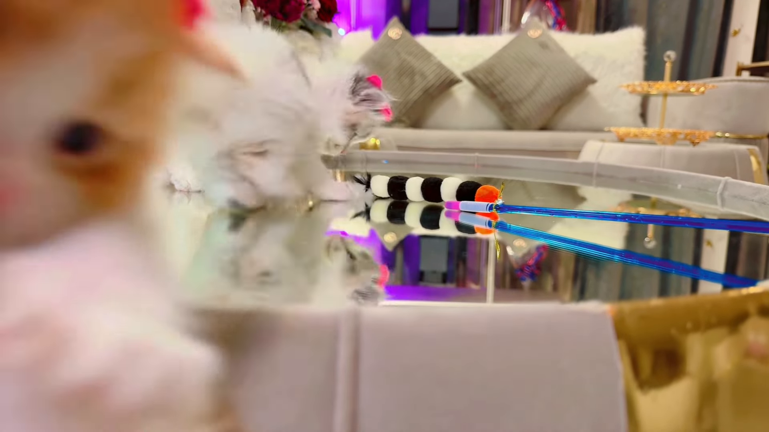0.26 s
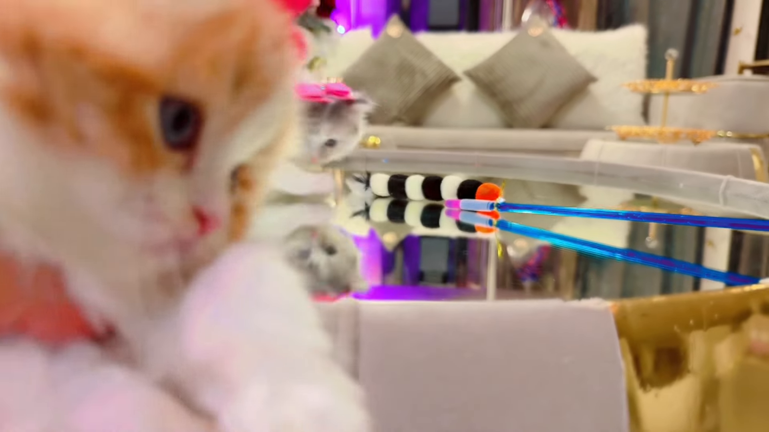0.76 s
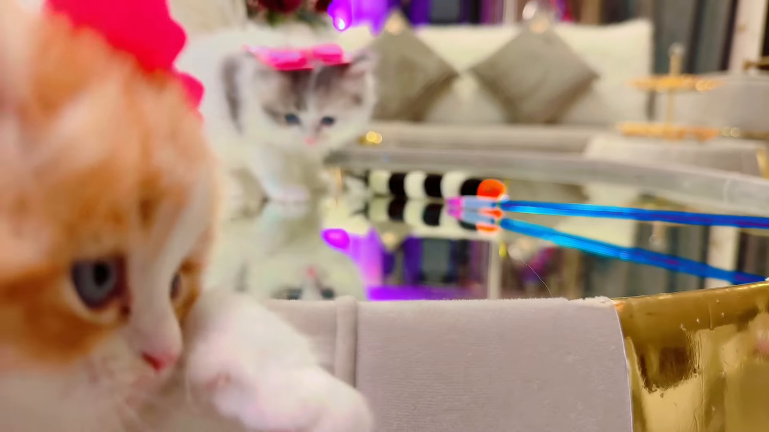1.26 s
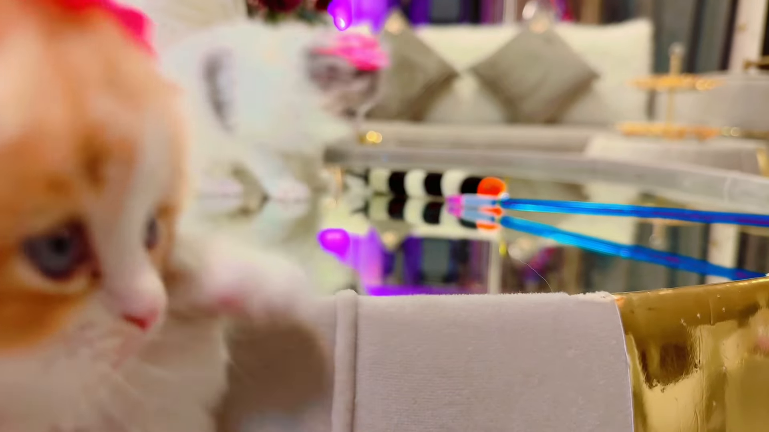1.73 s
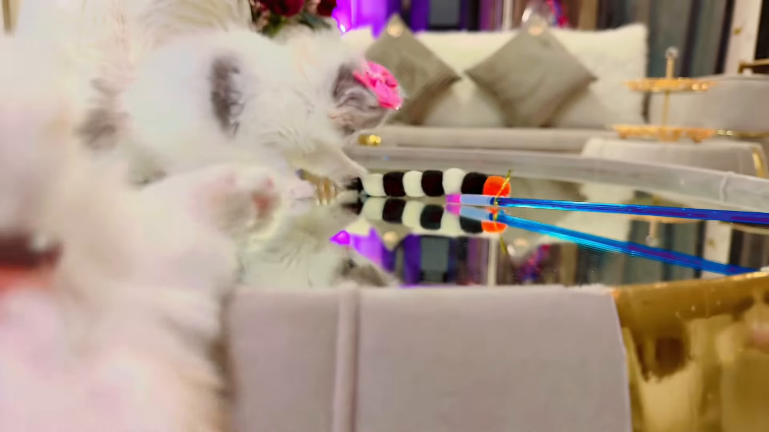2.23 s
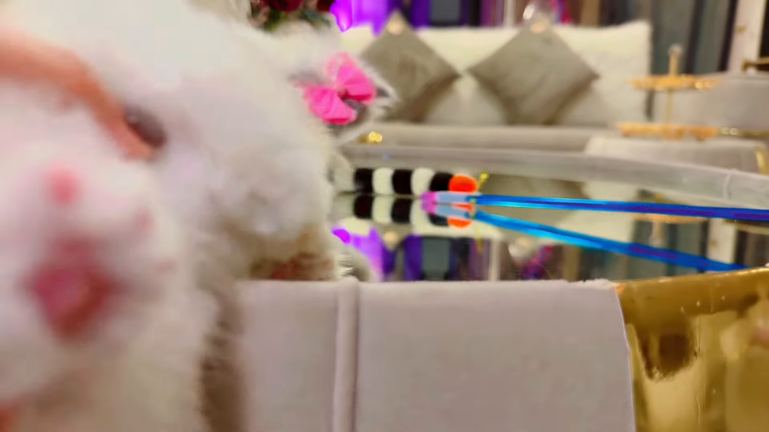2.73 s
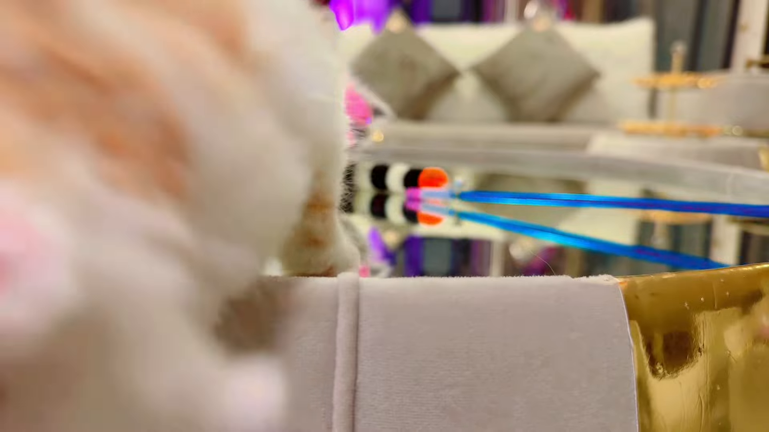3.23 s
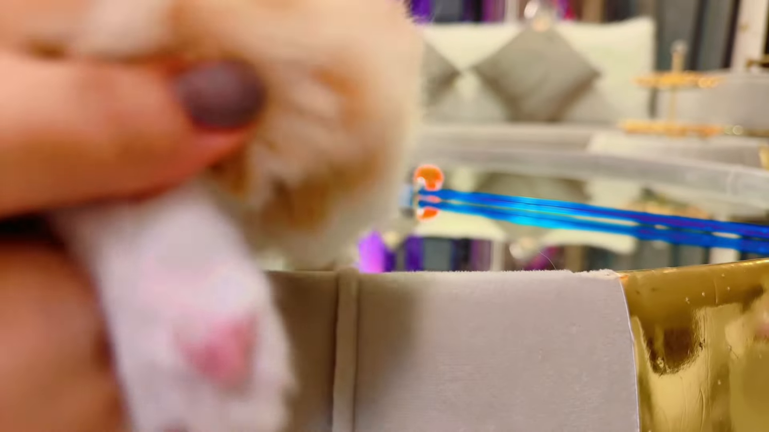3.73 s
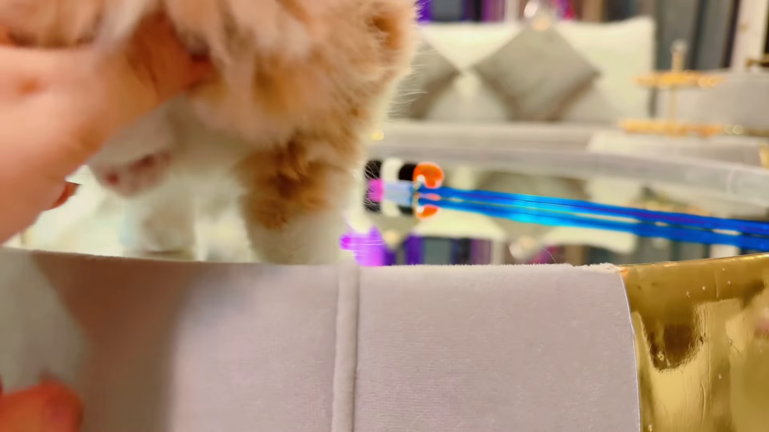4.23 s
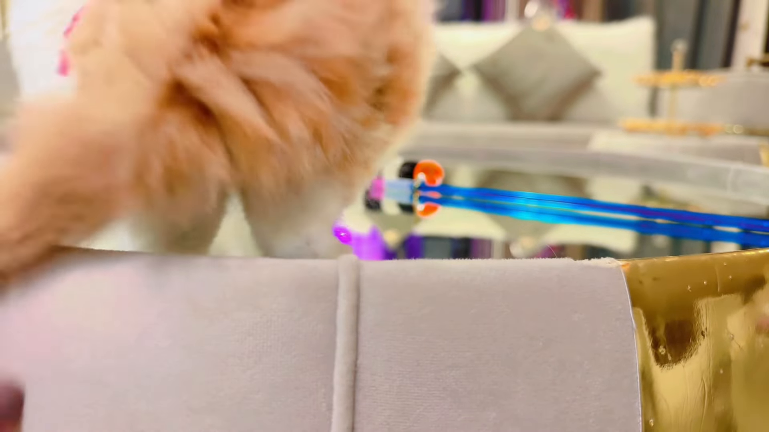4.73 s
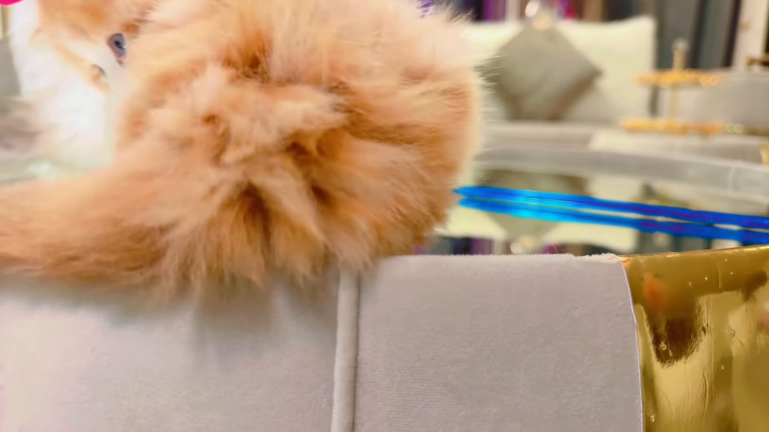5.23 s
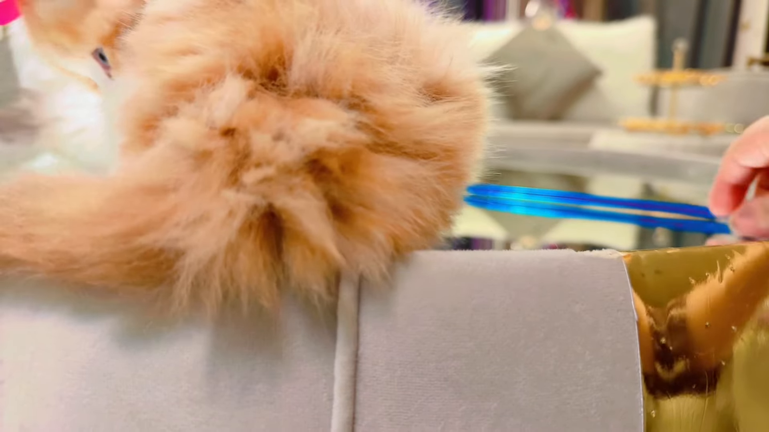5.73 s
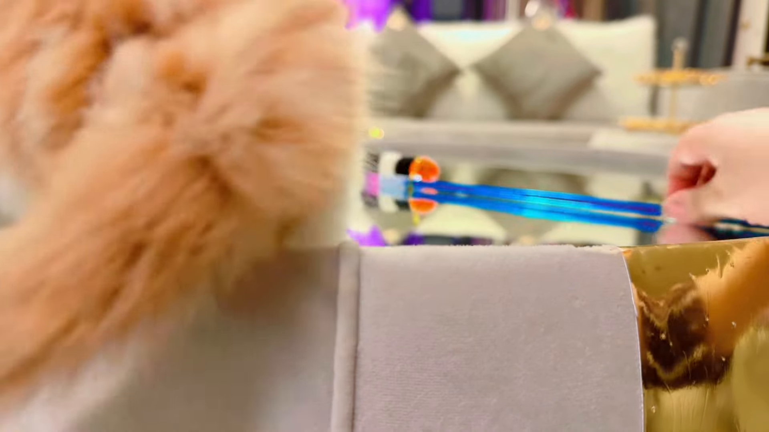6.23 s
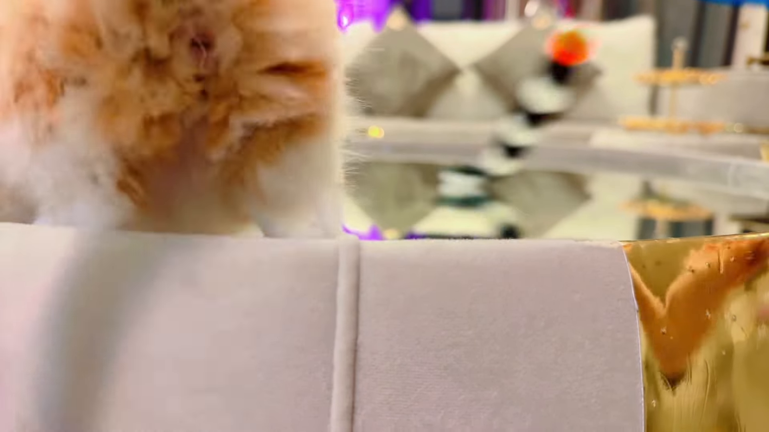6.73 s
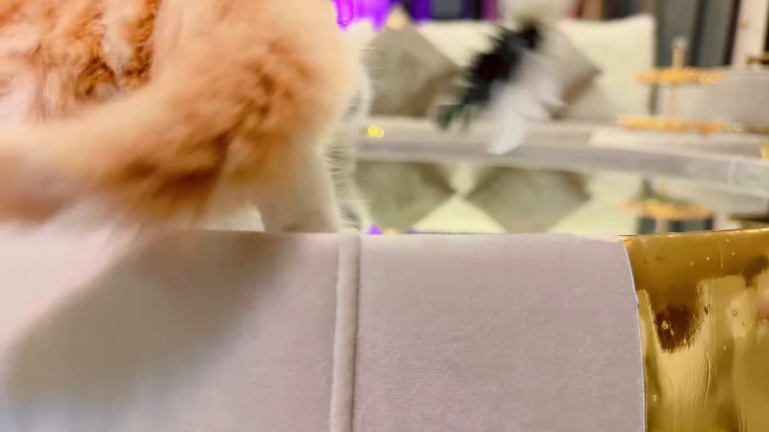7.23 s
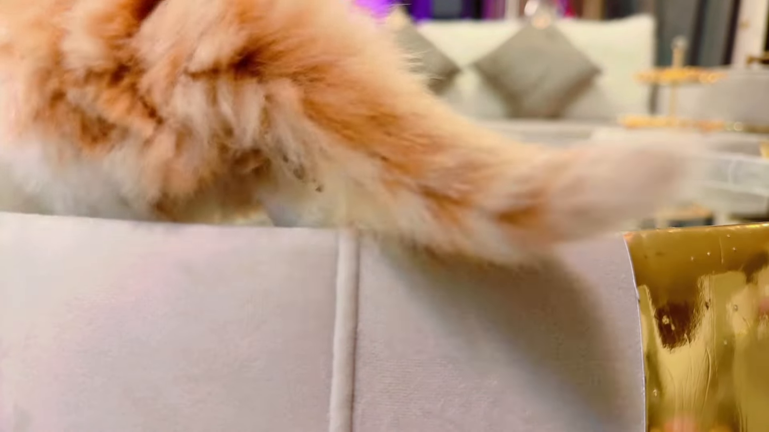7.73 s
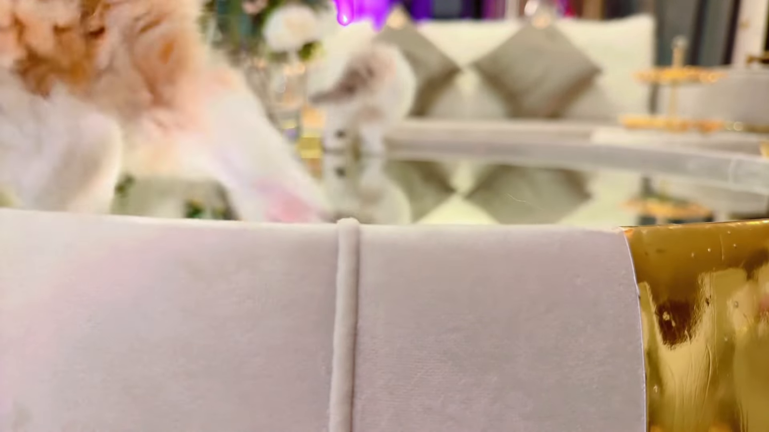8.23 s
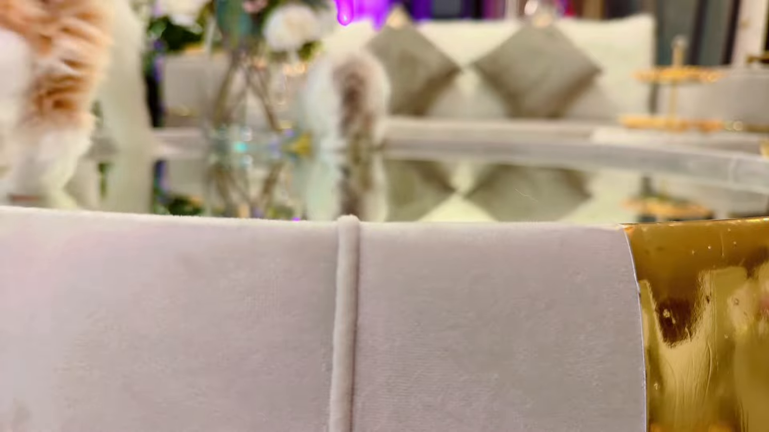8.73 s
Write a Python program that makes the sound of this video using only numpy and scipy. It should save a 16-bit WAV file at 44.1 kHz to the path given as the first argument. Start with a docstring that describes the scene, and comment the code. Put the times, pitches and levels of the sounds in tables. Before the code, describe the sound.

A furnished living room, heard close by a phone, with steady wavering low hum around 100 Hz and faint hiss. From 0 to 0.8 s, soft dull paw bumps; a barely audible very high squeak at the start and occasional tiny high ticks. At 2.0 s a tiny pellet bell and light knock, then faint fur scuffs and another touch at 2.7 s. Around 3.1-3.4 s the bell rattles and a hard, loud knock tumbles on glass with metal chinks. From 4.1 to 4.8 s, scuffs, light taps and bright chinks, strongest at 4.6 s. A soft bump at 5.6 s. At 6.1 s the bell strikes sharply, with a crisp tick at 6.3 s, then shakes in irregular dry high rattles, densest from 7.6 to 8.3 s. From 8.35 s to the end near 9 s, claws pluck fabric in dry, crackling snaps over a grainy drag, thinning out but continuing.

```python
"""Living room with a low hum: kittens romp on a glass table with an upholstered rim, close to a phone.
A wand toy's tiny pellet bell (noise-buzzed impulses through a shell resonance) is batted, lifted and shaken.
Hard bits knock on the glass and metal trinkets chink (decaying modes plus noise); paws thud and scuff
(filtered noise); a thin squeak (gliding sine) and high ticks (resonant noise) pass by.
At the end claws pluck the fabric (coloured clicks over grainy noise)."""
import sys
import numpy as np
from scipy import signal
from scipy.fft import rfft, irfft, next_fast_len
from scipy.io import wavfile
from scipy.ndimage import uniform_filter1d

SR = 44100
rng = np.random.default_rng(int(sys.argv[2]) if len(sys.argv) > 2 else 0)


def transcribe(signal):
    """Save signal, clipped to [-1, 1], as a 16-bit WAV file at the path in sys.argv[1]."""
    frames = np.atleast_2d(signal).T
    limited = np.clip(frames, -1, 1)
    pcm = np.round(limited * 32767).astype(np.int16)
    wavfile.write(sys.argv[1], SR, pcm)


N = 395136
T = np.arange(N) / SR
RING_T = T[:SR // 3]

# Jolts throw the pellet at its shell, then it rattles (10 ms at least):
# start_s, strike_peak_db (before trim), rattle_db, rattle_s
JOLTS = [(1.9897, -24.5, -54, 0.06), (1.995, -30, -54, .01), (2.617, -52, -70, .01),
         (2.702, -29, -58, 0.11), (2.874, -53, -62, 0.013), (3.047, -63, -59, 0.14),
         (3.115, -24, -44, 0.01), (3.1225, -24.5, -46, 0.018), (3.1487, -35, -56, .01),
         (3.157, -30, -52, 0.04), (3.316, -23, -39, .02), (3.368, -25, -41, 0.033),
         (3.4148, -30.5, -56, 0.043), (3.545, -51, -65, .01), (5.578, -44, -61, 0.032),
         (6.0776, -16.5, -43, 0.014), (6.092, -25, -49.5, 0.07), (6.2298, -20.5, -49, 0.052),
         (6.431, -42, -58, 0.045), (6.6588, -23, -46, 0.02), (6.708, -37, -56, .01),
         (6.7451, -37, -52, 0.024), (6.7726, -37, -49, .018), (6.828, -37, -46, 0.025),
         (6.8514, -25, -50, .012), (6.906, -28, -44.5, 0.027), (6.942, -27, -50, 0.029),
         (6.9855, -30, -56, 0.017), (7.224, -33, -55, 0.02), (7.2706, -35, -61, 0.012),
         (7.309, -31, -49, 0.01), (7.317, -32, -46, 0.011), (7.3212, -31, -47, 0.014),
         (7.422, -37, -56, 0.013), (7.4783, -29, -50, .01), (7.483, -27.5, -49, .01),
         (7.493, -30, -46, 0.023), (7.523, -39, -48.5, 0.033), (7.577, -35, -60, .01),
         (7.585, -25, -37, 0.013), (7.591, -21, -33, 0.016), (7.6035, -22, -42, 0.013),
         (7.6177, -23, -50, .01), (7.6315, -23, -39, 0.011), (7.6396, -26, -34, 0.0084),
         (7.651, -23, -47, 0.029), (7.698, -30, -43, 0.018), (7.749, -38, -47, 0.026),
         (7.779, -27, -53, 0.033), (7.9166, -27.5, -52, 0.039), (8.056, -28, -46, 0.01),
         (8.065, -24.5, -52, 0.017), (8.1065, -16.5, -31, 0.01), (8.1168, -23, -43, 0.016),
         (8.134, -30, -48, 0.044), (8.1782, -19.5, -38, 0.016), (8.211, -23, -48, 0.01),
         (8.225, -25, -45, 0.01), (8.2333, -31, -44, .01), (8.2379, -31, -46, 0.026),
         (8.292, -31, -54, .01), (8.333, -26.5, -45, 0.013)]
# Pellet rolling while the wand is carried: time_s, level_db (before trim)
ROLLING = [(6.1, -72), (6.17, -68), (6.27, -61.5), (6.62, -59.5), (6.82, -53), (7.01, -83), (7.24, -63.5),
           (7.46, -68), (7.62, -53), (7.73, -75), (7.88, -50.5), (8.04, -62), (8.15, -49), (8.26, -49),
           (8.32, -64), (8.4, -61)]
# Shell swings free of the fur and rings until touched: start_s, peak_db (before trim), t60_s
FREE_RINGS = [(6.08, -26.5, 0.054), (6.604, -35, 0.079), (6.651, -30, 0.045), (6.765, -43, .08),
              (6.92, -42, 0.073), (7.299, -39, .06), (7.4224, -48, 0.06), (7.6176, -32, 0.081),
              (8.21, -39, 0.22)]


def bell(strike_trim_db=3, settle_db=5, roll_trim_db=-2, ring_trim_db=-2.5, graze_db=-21, graze_s=0.0025):
    """A pellet strikes a tiny shell that fur mostly damps; it rattles after each jolt and rolls on between."""
    carried_s, carried_db = np.transpose(ROLLING)
    roll_gain = np.interp(T, carried_s, undb(carried_db + roll_trim_db), left=0, right=0)
    out = rolling(rate_hz=110, spread_db=11.5) * roll_gain
    rattle = rolling(rate_hz=380, spread_db=13.5)
    for start_s, strike_db, rattle_db, rattle_s in JOLTS:
        # the pellet grazes the shell just before it hits
        add(out, start_s - graze_s, undb(strike_db + graze_db) * tink())
        add(out, start_s, undb(strike_db + strike_trim_db) * tink())
        run = rattle[(T >= start_s) & (T < start_s + max(rattle_s, .01))]
        settle = undb(np.linspace(0, -settle_db, len(run))) * signal.windows.tukey(len(run), .1)
        add(out, start_s, level(run * settle, rattle_db))
    for start_s, peak_db, t60_s in FREE_RINGS:
        add(out, start_s, undb(peak_db + ring_trim_db) * shell_tone(t60_s))
    return out


def rolling(rate_hz, spread_db, spots=8):
    """The pellet lands at random, with uneven force, on different spots of the shell."""
    force = undb(spread_db * rng.uniform(-1, 1, N))
    hits = (rng.random(N) < rate_hz / SR) * force
    spot = rng.integers(0, spots, N)
    return level(sum(signal.oaconvolve(hits * (spot == k), tink())[:N] for k in range(spots)), 0)


# Broad resonance of the damped shell: pitch_hz (before detune), gain_db (before peak scaling)
SHELL_COLOUR = [(1000, -65.5), (5000, -43.5), (6000, -36), (6550, -32.5), (7100, -39), (8000, -33),
                (9000, -19.5), (9600, -6.5), (9900, 2.5), (10400, -7), (11000, -16), (12000, -26.5),
                (13000, -26), (16000, -33)]
# Shell ring after each touch: pitch_hz (before detune), level_db, t60_s
SHELL_MODES = [(6600, -41.5, 0.037), (9630, -26, .032), (10600, -31, .035), (11120, -30, 0.078)]


def tink(detune=0.0071, buzz_db=-27, buzz_t60_s=0.011, size=4096):
    """One pellet touch: a randomly detuned damped click, a brief buzz and a faint ring of the shell."""
    push = undb(buzz_db) * burst(buzz_t60_s)[:size]
    push[0] += 1
    shift = 1 + detune * rng.standard_normal()
    damped = peak(colour(push, [(hz * shift, db) for hz, db in SHELL_COLOUR]), 0)
    return damped + ring(SHELL_MODES, scatter_db=0.0, detune=0.0019)[:size]


def shell_tone(t60_s, pitch_hz=11190):
    """The shell's one clear tone, dying away."""
    return fade(t60_s) * np.sin(2 * np.pi * pitch_hz * RING_T)


# Hard knocks on the glass, a tumble after 3.3 s: start_s, peak_db (before trim),
# thump_peak_db (before trim), piece_hz, piece_re_peak_db, crack_upper_edge_hz
KNOCKS = [(1.9884, -34.5, -53, 3460, -17, 12000), (1.997, -39.5, -57, 4000, -14, 12000),
          (2.112, -51, -51, 7300, -6, 9000), (2.6995, -39, -53, 3210, -13, 9000),
          (2.707, -41.5, -58, 3800, -15, 9000), (3.3147, -13.5, -38, 3090, -13, 13000),
          (3.324, -35, -43, 1770, -4, 12000), (3.335, -31.5, -36.5, 5160, 0, 12000),
          (3.345, -41, -43, 3725, -8, 12000), (3.3714, -20.5, -35, 3240, -22, 14000),
          (3.38, -35, -38, 936, -6.5, 14000), (3.387, -34.5, -33.5, 8500, -2, 14000),
          (3.414, -41, -37, 1020, -1, 14000), (3.438, -38, -35.5, 3400, -4, 12000),
          (4.116, -47, -62, 4300, -16, 9000), (4.179, -48, -62, 3860, -19, 7000),
          (4.469, -44.5, -66, 2860, -5, 8000), (4.499, -42, -67, 2840, -8, 7000),
          (4.577, -49, -66, 2800, -8, 9000), (5.577, -44.5, -43, 2170, 1.5, 3500),
          (6.077, -31.5, -52, 1720, -13, 9000), (6.08, -40.5, -57, 2880, 0, 9000),
          (6.1797, -33, -40, 3270, -11, 5540), (6.229, -41.5, -58, 2620, -7.5, 8000),
          (7.961, -48.5, -66, 3780, -3, 9000), (8.107, -48, -70, 2230, -8, 6000)]
# Modes of the table and the toy on it: pitch_hz (before detune), level_db (relative), t60_s
TABLE_MODES = [(581, -12, .16), (720, -10, .07), (930, -7, .08), (1093, -4, .1), (1380, -9, .06),
               (1740, -4.5, .06), (1809, -3, .09), (3020, -7, .05), (3321, -9, .16), (3690, -10, .13),
               (4381, -11, .15), (4853, -10, .14), (5170, -7, .2), (5522, -5, .18), (5943, -9, .18),
               (6234, -9, .06), (6961, -12, .16), (7471, -9, .18), (7931, -9, .16), (8376, -12, .18)]


def knocks(knock_trim_db=1, modes_db=-5, stir=0.24, hard_knock_db=-11, click_db=-1, click_t60_s=0.0079,
           crack_t60_s=0.032, clatter_db=-18, clatter_t60_s=0.23, body_db=-1, body_hz=3600, body_q=1.8,
           piece_t60_s=0.032, thump_trim_db=-2):
    """A contact clicks and cracks, struck piece and table ring, loose things clatter, the frame thumps."""
    out = np.zeros(N)
    for start_s, peak_db, thump_db, piece_hz, piece_db, edge_hz in KNOCKS:
        # light touches barely stir the heavy glass
        stirred_db = modes_db + stir * (peak_db - hard_knock_db)
        modes = peak(ring(TABLE_MODES, scatter_db=2.0, detune=0.0006), stirred_db)
        click = undb(click_db) * burst(click_t60_s)
        clatter = undb(clatter_db) * burst(clatter_t60_s)
        crack = band(click + burst(crack_t60_s) + clatter, 470, edge_hz)
        crack = peak(crack + undb(body_db) * resonate(crack, body_hz, body_q), 0)
        piece = undb(peak_db + piece_db) * fade(piece_t60_s) * np.sin(2 * np.pi * piece_hz * RING_T)
        thump = peak(band(burst(0.1), 104, 490), thump_db + thump_trim_db)
        add(out, start_s, peak(modes + crack, peak_db + knock_trim_db) + piece + thump)
    return out


# Thread snaps: start_s, peak_db (before trim), tilt_db_per_octave
SNAPS = [(8.333, -45, -2), (8.3385, -41, -2), (8.344, -41, -8), (8.3548, -24, 0.5), (8.3565, -22, -1),
         (8.3639, -16, 0.5), (8.388, -32, -2), (8.391, -25, 2), (8.4064, -14.5, 1.5), (8.416, -25, 0),
         (8.4203, -25.5, -1), (8.4306, -28, 0.5), (8.472, -32, -1), (8.4832, -19, 1.5), (8.4852, -19.5, 4),
         (8.4962, -30, -1.5), (8.539, -35, -2), (8.5536, -27, 0.5), (8.5685, -19.5, -2), (8.5698, -24, -2),
         (8.5812, -32, 2), (8.592, -23, 3), (8.6017, -31, -4), (8.617, -19.5, 1.5), (8.63, -33, 1),
         (8.638, -28, -0.5), (8.6454, -31.5, -2.5), (8.701, -37, -3), (8.7201, -34.5, -3.5),
         (8.739, -37, -2.5), (8.7665, -34, -2.5), (8.7849, -24.5, -1.5), (8.7934, -26, 0),
         (8.8018, -27, -1), (8.807, -28, 0), (8.8235, -22.5, 7), (8.8332, -25.5, -1.5), (8.8452, -28.5, 0)]
# Claw dragging through the pile: pitch_hz, gain_db (before level scaling)
FIBRE_COLOUR = [(300, -1.5), (900, 1.5), (1800, 2.5), (3000, -2.5), (7000, -9), (16000, -18)]


def claws(snap_trim_db=2.0, slip_db=-11, slip_s=0.00076, drag_db=-39.5, drag_s=0.021, grain_db=6):
    """A claw drags through fine fibres, slips a little, then taut threads let go one by one with dry snaps."""
    out, pull = np.zeros(N), np.zeros(N)
    for start_s, peak_db, tilt in SNAPS:
        add(out, start_s - slip_s, undb(peak_db + slip_db) * snap(tilt))
        add(out, start_s, undb(peak_db + snap_trim_db) * snap(tilt))
        near = np.abs(T - start_s) < .1
        pull[near] += undb(peak_db) * np.exp(-np.abs(T[near] - start_s) / drag_s)
    fibres = rng.standard_normal(N) * undb(grain_db * walk(500))
    return out + pull * level(colour(fibres, FIBRE_COLOUR), drag_db)


# Snapping thread: pitch_hz (before detune), gain_db (before tilt and scatter)
SNAP_COLOUR = [(300, -16), (800, -6), (1250, 2), (1900, 9.5), (2500, 3), (3100, -1.5), (3600, 2),
               (4300, -0.5), (6200, 0.5), (7200, 4.5), (7700, -2.5), (9000, 0), (10700, 5.5), (12500, -4.5),
               (13800, 3), (16000, -2.5)]


def snap(tilt, fray_db=-10, fray_t60_s=0.0052, detune=0.054, scatter_db=3.0):
    """One thread lets go: a sharp click and a trace of fraying, with random pitch and colour."""
    push = undb(fray_db) * burst(fray_t60_s)[:1024]
    push[0] += 1
    shift = np.exp(detune * rng.standard_normal())
    scatter = scatter_db * rng.standard_normal(len(SNAP_COLOUR))
    points = [(hz * shift, db + tilt * np.log2(hz) + extra)
              for (hz, db), extra in zip(SNAP_COLOUR, scatter)]
    return peak(colour(push, points), 0)


# Metal trinket jangles: start_s, peak_db (before trim), t60_s, jangle_s
CHINKS = [(3.079, -35.5, 0.031, 0), (3.223, -25.5, 0.012, 0), (3.314, -23.5, 0.09, 0.025),
          (3.375, -33, .08, 0), (3.392, -31, 0.073, .015), (3.593, -40.5, 0.052, 0),
          (4.139, -28.5, 0.058, 0.051), (4.357, -44, 0.046, 0), (4.378, -38, 0.1, 0.017),
          (4.491, -39, .037, 0), (4.586, -25, 0.13, 0), (4.603, -21, 0.14, 0), (4.746, -36.5, 0.061, 0.03),
          (4.83, -37.5, 0.039, 0.02), (5.577, -47, .03, 0), (7.256, -44, 0.042, 0.047)]
# Trinket modes: pitch_hz (before detune), level_db (relative)
TRINKET_MODES = [(6150, -5), (6260, -10), (7100, -12), (8100, -16), (8750, -10), (8880, -11), (9700, -4),
                 (10300, 4), (10480, -3), (10950, -2), (11400, -4), (11850, -8), (12600, -2), (12850, -5),
                 (13400, -5), (14050, -3), (14600, -7), (15400, -2), (15580, -2)]


def chinks(chink_trim_db=1, scrape_db=-2, grain_db=5, gap_s=0.021, fall_db=5):
    """Small metal pieces jangle with a bright ring and a grainy scrape."""
    out = np.zeros(N)
    for start_s, first_db, t60_s, jangle_s in CHINKS:
        modes = [(hz, db, t60_s) for hz, db in TRINKET_MODES]
        for contact_s, peak_db in flurry(start_s, first_db, jangle_s, gap_s, fall_db):
            metal = peak(ring(modes, scatter_db=5.0, detune=0.006), 0)
            steps = np.repeat(rng.standard_normal(len(RING_T) // 64 + 1), 64)[:len(RING_T)]
            grain = undb(grain_db * steps)
            scrape = peak(band(burst(t60_s) * grain, 9160, 15000), scrape_db)
            add(out, contact_s, peak(metal + scrape, peak_db + chink_trim_db))
    return out


def flurry(start_s, peak_db, length_s, gap_s, fall_db, uneven=.07):
    """A run of contacts about one gap apart, growing weaker: rows (start_s, peak_db)."""
    count = int(round(length_s / gap_s)) + 1
    along = np.linspace(0, 1, count)
    slack_s = uneven * gap_s * rng.standard_normal(count) * (along > 0)
    return zip(start_s + length_s * along + slack_s, peak_db - fall_db * along)


# Dull bumps of paws and bodies: start_s, level_db (before trim), low_end_re_bump_db (before trim)
BUMPS = [(0.065, -47.5, -10), (0.137, -51, -7), (0.189, -48.5, -16), (0.314, -39, -23), (0.497, -49.5, -9),
         (0.726, -47, 1), (5.549, -52, 1), (5.578, -54.5, 10.5), (6.185, -52, 15.5), (6.289, -52, 5)]
# Fur and pads brushing the table: centre_s, length_s, level_db (before trim and swell), resonance_hz
SCUFFS = [(2.028, 0.32, -66, 1250), (2.03, 0.091, -63, 4800), (2.122, 0.13, -65.5, 3480),
          (2.143, 0.063, -73, 7250), (2.29, 0.063, -61, 1360), (2.74, 0.078, -62, 3900),
          (3.42, 0.07, -42.5, 3840), (4.13, 0.046, -60, 5330), (4.174, 0.12, -60, 1310),
          (4.183, 0.051, -59, 5000), (4.423, .04, -63, 3100), (4.51, 0.086, -56, 2820),
          (4.517, .06, -60, 6460), (4.6, 0.082, -56.5, 2960), (4.677, 0.083, -64, 4800),
          (4.717, 0.08, -57.5, 11000), (5.578, 0.008, -46, 2310), (6.13, .08, -61, 4600),
          (6.2, .035, -58, 10000), (6.27, 0.045, -59, 2900), (6.292, 0.04, -57, 1240),
          (6.437, 0.06, -62.5, 1590), (6.463, 0.1, -67, 4000), (6.573, 0.095, -65.5, 2600),
          (6.606, .07, -68, 3900), (7.513, 0.018, -56, 1280), (7.868, .02, -66, 1300),
          (7.985, 0.051, -64, 3740)]
# Brushing hiss: pitch_hz, gain_db (before level scaling)
SCUFF_COLOUR = [(300, -13), (900, 9), (2800, -3), (6000, -7), (10000, -2), (16000, -5)]


def paws(bump_trim_db=-1, bump_t60_s=0.2, pat_db=-9, pat_t60_s=0.017, low_trim_db=-2, scuff_trim_db=-2,
         grain_db=6.0, resonance_db=10, resonance_q=5):
    """A pad lands with a soft pat and a dull bump; fur and pads brush with a grainy resonant hiss."""
    out = np.zeros(N)
    for start_s, bump_db, low_db in BUMPS:
        body = peak(band(burst(bump_t60_s), 390, 860), 0)
        low = peak(band(burst(0.073), 135, 228), low_db + low_trim_db)
        pat = peak(band(burst(pat_t60_s), 1050, 2600), pat_db)
        add(out, start_s, undb(bump_db + bump_trim_db) * (body + low + pat))
    brush = colour(rng.standard_normal(N) * undb(grain_db * walk(250)), SCUFF_COLOUR)
    for centre_s, length_s, level_db, resonance_hz in SCUFFS:
        near = np.abs(T - centre_s) < 1.5 * length_s
        rub = brush[near] + undb(resonance_db) * resonate(brush[near], resonance_hz, resonance_q)
        swell = np.exp(-(2 * (T[near] - centre_s) / length_s) ** 2)
        out[near] += level(rub, level_db + scuff_trim_db) * swell
    return out


# One thin squeak: time_s, peak_db (before trim), pitch_hz
SQUEAK = [(0, -76, 13400), (.045, -64, 14800), (.075, -65.5, 14550), (.115, -68, 14550), (.155, -80, 13100)]


def squeak(trim_db=-2):
    """A faint, very high sine arches up and down in pitch."""
    time_s, peak_db, pitch_hz = np.transpose(SQUEAK)
    gain = np.interp(T, time_s, undb(peak_db + trim_db), left=0, right=0)
    phase = 2 * np.pi * np.cumsum(np.interp(T, time_s, pitch_hz)) / SR
    return gain * np.sin(phase)


# High dry ticks: start_s, peak_db (before trim), pitch_hz
TICKS = [(0.458, -47, 15500), (0.7282, -48, 15700), (1.2271, -49, 13000), (1.476, -47, 13000),
         (1.7386, -42, 15700), (2.237, -51, 12500), (2.987, -50, 13500), (5.2314, -44, 14900),
         (6.3032, -23, 15200), (6.5015, -41, 15000), (7.043, -49, 13500)]


def ticks(trim_db=2, t60_s=0.014, q=6):
    """Tiny dry ticks, very high and close: short noise through a resonance."""
    out = np.zeros(N)
    for start_s, peak_db, pitch_hz in TICKS:
        tick = resonate(band(burst(t60_s), 9000, 16000), pitch_hz, q)
        add(out, start_s, peak(tick, peak_db + trim_db))
    return out


# Room air spectrum: pitch_hz, density_db_per_hz (before level scaling)
AIR = [(12, -57), (20, -43.5), (41, -4), (96, 0), (130, -9.5), (182, -10.5), (285, -22), (410, -20),
       (558, -28.5), (802, -30), (1030, -31), (1150, -34), (8410, -50), (13200, -47), (16000, -49)]
# Slow swell of the hiss: time_s, gain_db
HISS = [(0, 3), (.6, 3.5), (1.4, 0), (1.9, 0), (3.8, 3.5), (5.1, 4), (5.76, 5.5), (5.92, 8), (6.4, 4),
        (7.1, 0.5), (8.96, 2)]
# Hum of the building: pitch_hz, level_db, waver_hz
HUM = [(101.25, -58, 3.08), (54.6, -65.5, 3.23), (74.5, -71.5, 3.96), (394, -88, 12.1)]


def room_tone(air_db=-49.5, hiss_hz=1500, hum_sway_db=3.9):
    """A steady rumble with wavering hum lines, under a faint hiss that swells and sinks a little."""
    air = level(colour(rng.standard_normal(N), AIR), air_db)
    hiss = signal.sosfilt(signal.butter(1, hiss_hz, "high", fs=SR, output="sos"), air)
    swell = undb(np.interp(T, *np.transpose(HISS)))
    out = air + hiss * (swell - 1)
    for pitch_hz, level_db, waver_hz in HUM:
        phase = 2 * np.pi * np.cumsum(pitch_hz + waver_hz * walk(14)) / SR
        out += level(np.sin(phase) * undb(hum_sway_db * walk(9)), level_db)
    return out


def room(x, wet_db, t60_s=0.34, early_db=-13, early_t60_s=0.016, dull_hz=13000):
    """Quick reflections off the table, then the short tail of a furnished room that soaks up the top."""
    early = burst(early_t60_s) * (RING_T > .0012)
    early = undb(early_db) * early / np.linalg.norm(early)
    tail = burst(t60_s) * (RING_T > .007)
    tail = signal.lfilter(*signal.butter(1, dull_hz, fs=SR), tail / np.linalg.norm(tail))
    return x + (signal.oaconvolve(x, early) + signal.oaconvolve(x * undb(wet_db), tail))[:N]


def undb(db):
    """Decibels to gain."""
    return 10 ** (np.asarray(db) / 20)


def level(x, db):
    """Scale to an rms level."""
    return x * undb(db) / np.sqrt(np.mean(x ** 2))


def peak(x, db):
    """Scale to a peak level."""
    return x * undb(db) / np.abs(x).max()


def add(out, start_s, x):
    """Mix x into out at start_s."""
    i = int(np.clip(start_s * SR, 0, N - 1))
    out[i:i + len(x)] += x[:N - i]


def fade(t60_s):
    """Exponential decay, 60 dB in t60_s."""
    return np.exp(-np.log(1000) * RING_T / t60_s)


def burst(t60_s):
    """A dying puff of noise."""
    return rng.standard_normal(len(RING_T)) * fade(t60_s)


def colour(x, points):
    """Minimum-phase filter through (pitch_hz, gain_db) points."""
    hz, db = np.transpose(points)
    size = 2 * next_fast_len(len(x) // 2 + 2048)
    log_hz = np.log(np.arange(size // 2 + 1) * SR / size + 1)
    cepstrum = irfft(np.log(undb(np.interp(log_hz, np.log(hz), db))))
    # folding the cepstrum makes the filter causal
    cepstrum[1:size // 2] *= 2
    cepstrum[size // 2 + 1:] = 0
    return irfft(rfft(x, size) * np.exp(rfft(cepstrum)))[:len(x)]


def band(x, lo_hz, hi_hz):
    """Gentle band-pass."""
    return signal.sosfilt(signal.butter(2, [lo_hz, hi_hz], "band", fs=SR, output="sos"), x + 1e-18)


def resonate(x, hz, q):
    """One resonance, gain 1 at its centre."""
    return signal.lfilter(*signal.iirpeak(hz, q, fs=SR), x + 1e-18)


def walk(rate_hz):
    """Smoothed random steps with rms 1."""
    k = int(SR / rate_hz)
    steps = np.repeat(rng.standard_normal(N // k + 1), k)
    return level(uniform_filter1d(steps, k)[:N], 0)


def ring(modes, scatter_db, detune):
    """Decaying modes; each blow lands elsewhere and weights them anew."""
    out = np.zeros(len(RING_T))
    for hz, db, t60_s in modes:
        weight, shift = rng.standard_normal(2)
        tone = np.sin(2 * np.pi * hz * (1 + detune * shift) * RING_T)
        out += undb(db + scatter_db * weight) * fade(t60_s) * tone
    return out


# Room tail of the bell, across the table until lifted towards the phone: time_s, wet_db
BELL_ROOM = [(2, -11), (2.75, -8), (3.1, -9), (6.1, -10), (6.3, -16), (6.65, -16), (8.3, -17.5)]


def scene():
    """The ticks, the claws and the lifted bell are nearest, so they are driest."""
    near = room(bell(), wet_db=np.interp(T, *np.transpose(BELL_ROOM)))
    near += room(claws(), wet_db=-15.5) + ticks()
    table = room(knocks(), wet_db=-9.5) + room(chinks(), wet_db=-11.0)
    table += room(paws() + squeak(), wet_db=-3.5)
    return (near + table + room_tone())[None]


def record(dry, top_hz=16000):
    """The phone cuts the top with a steep low-pass."""
    return signal.sosfilt(signal.ellip(8, .2, 70, top_hz, fs=SR, output="sos"), dry)


dry = scene()
out = record(dry)
transcribe(out)
```